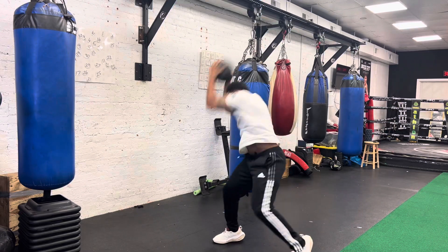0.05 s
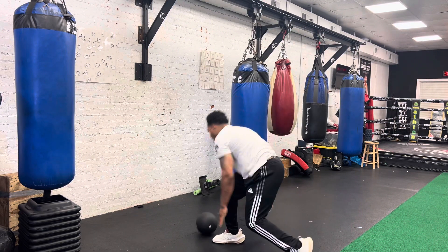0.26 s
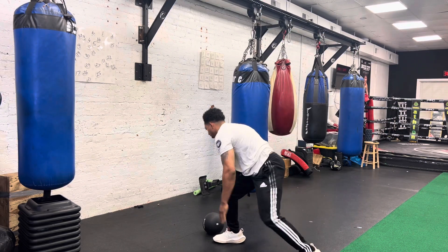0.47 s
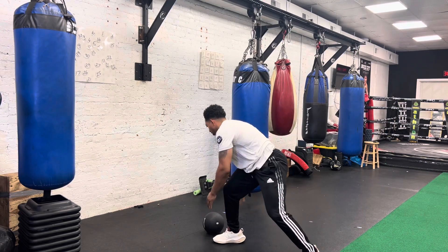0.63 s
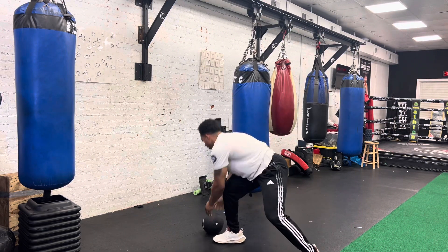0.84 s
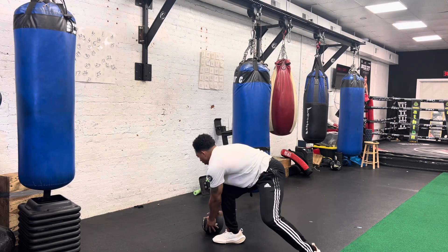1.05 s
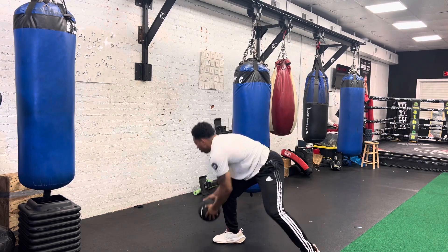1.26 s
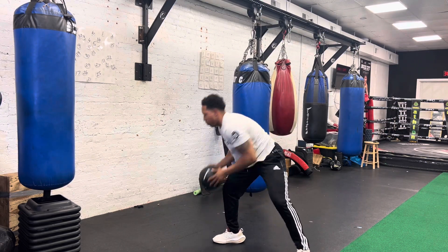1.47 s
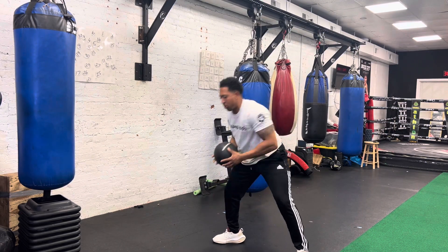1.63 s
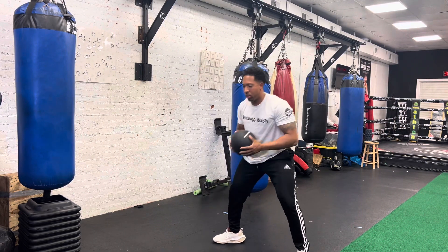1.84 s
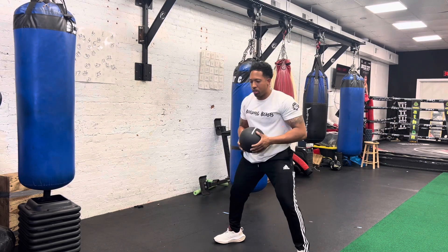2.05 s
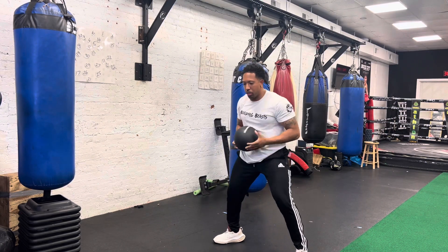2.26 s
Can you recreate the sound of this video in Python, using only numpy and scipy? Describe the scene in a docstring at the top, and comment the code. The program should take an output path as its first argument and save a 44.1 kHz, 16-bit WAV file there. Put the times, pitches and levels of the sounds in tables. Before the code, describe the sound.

A heavy rubber medicine ball slams onto a gym floor at about 0.2 seconds, right after a quick swish of clothes and air and a foot stamp. The loud slap and ringing thud echo through the large room, with a low boom fading over about a second. Hands faintly touch the ball at 1 second and catch it with a soft pat near 1.65. Ventilation hums faintly throughout.

```python
"""A swish of clothes and air and a foot stamp, then a heavy rubber medicine ball slams on a gym floor.
Its skin slaps, and the impact excites the ball's damped modes: a ringing thud. Slap and thud reflect
from the walls, low modes of floor and hall boom, and reverberation rolls around the large room.
The ball is picked up and caught in the hands, while the ventilation hums and hisses throughout."""
import sys
import numpy as np
from scipy import signal
from scipy.fft import rfft, irfft, next_fast_len
from scipy.io import wavfile
from scipy.ndimage import map_coordinates

SR = 44100
rng = np.random.default_rng(int(sys.argv[2]) if len(sys.argv) > 2 else 0)


def put_to_file(sound):
    """Save the sound as 16-bit audio at rate SR, in the file named by the first command-line argument."""
    columns = np.atleast_2d(sound).T  # one column per channel
    safe = np.clip(columns, -1, 1)
    whole_steps = np.round(safe * 32767)
    wavfile.write(sys.argv[1], SR, whole_steps.astype(np.int16))


N = 101429
SLAM_S = .2115

# spectrum of the skin's slap on the floor (frequency [Hz], relative density [dB])
SLAP_SPECTRUM = [(200, -10), (900, 1), (2500, -1), (5000, -9), (8000, -16), (15000, -24.5)]
# spectrum of the hall's long, low afterglow (frequency [Hz], relative density [dB])
AFTERGLOW_SPECTRUM = [(40, -32.5), (90, 7.5), (160, 0), (300, -20), (600, -38.5), (2000, -64.5)]


def amp(db):
    """Decibels to amplitude ratio."""
    return 10 ** (np.asarray(db) / 20)


def unit(x):
    """Normalisation to rms 1."""
    return x / np.sqrt(np.mean(x ** 2) + 1e-20)


def along(points, hz):
    """Interpolation of (frequency, value) points on a logarithmic frequency axis."""
    f, v = np.transpose(points)
    return np.interp(np.log(hz + 1), np.log(f + 1), v)


def since(s):
    """Seconds elapsed since time s, zero before it."""
    return np.maximum(np.arange(N) / SR - s, 0)


def strike(s, rise, t60):
    """Exponential rise and decay from time s; rise and t60 are in seconds."""
    t = since(s)
    return (1 - np.exp(-t / rise)) * amp(-60 * t / t60)


def pan(db):
    """Level difference: two gains, the left db above the right."""
    return amp(np.array([[db], [-db]]) / 2)


def wobble(rate):
    """Random modulation: straight lines through rate Gaussian values a second."""
    return map_coordinates(rng.standard_normal(N // 8), [np.arange(N) * rate / SR], order=1)


def filtered(x, response):
    """Linear filtering: the spectrum of x times a frequency response."""
    size = next_fast_len(N + 8192)
    return irfft(rfft(x, size) * response(np.fft.rfftfreq(size, 1 / SR)), size)[..., :N]


def diffuse(spectrum):
    """Diffuse field: stereo noise of rms 1, alike in both channels at long wavelengths."""
    # likeness of left and right (frequency [Hz], correlation [1])
    correlation = [(60, .995), (130, .95), (290, .85), (640, .35), (1410, 0), (3100, .14), (7000, .1),
                   (15000, .2)]

    def mid_and_side(hz):
        angle = np.arccos(np.clip(along(correlation, hz), -1, 1)) / 2
        return amp(along(spectrum, hz)) * [np.cos(angle), np.sin(angle)]

    mid, side = filtered(rng.standard_normal((2, N)), mid_and_side)
    return unit(np.array([mid + side, mid - side]))


def reverberation(s, spectrum, held):
    """Reverberant decay, each frequency at its own rate; if held, it waits while the hall fills."""
    # reverberation time (frequency [Hz], t60 [s])
    decay_times = [(60, 1), (160, 0.53), (320, 0.67), (600, 0.46), (1200, .47), (2000, 0.66), (2800, .72),
                   (4200, 0.56), (7000, 0.53), (13000, .52)]
    # plateau before the decay (frequency [Hz], duration [s])
    hold_times = [(80, .085), (300, .07), (1000, .045), (3000, 0.016), (12000, 0.025)]
    hz, t, bins = signal.stft(diffuse(spectrum), SR, nperseg=512)
    age = np.maximum(t - s - held * along(hold_times, hz)[:, None], 0)
    decay = amp(-60 * age / along(decay_times, hz)[:, None])
    tail = signal.istft(bins * decay, SR, nperseg=512)[1][:, :N]
    return tail * (1 - np.exp(-since(s) / .007))


def ventilation():
    """Stationary noise, a rumble and a duct's hiss on the left; a wavering low drone joins later."""
    # broadband rumble (frequency [Hz], relative density [dB])
    rumble = [(20, -16), (35, -11.5), (55, 4.5), (90, 0), (140, -10.5), (260, -19.5), (500, -29),
              (900, -33), (2600, -45), (4000, -48.5), (7500, -54), (13000, -50.5), (16000, -57)]
    # narrow duct hiss (frequency [Hz], relative density [dB])
    duct = [(800, -41), (1150, -15.5), (1400, -5.5), (1560, 2.5), (1750, -7), (2050, -11.5), (2500, -27),
            (3500, -29), (5000, -36), (8000, -45.5)]
    drone_hz, t = 76, since(1.3)
    phase = 2 * np.pi * drone_hz * t + .33 * wobble(9.5)
    drone = amp(-49.5 + 3.5 * wobble(7)) * (1 - np.exp(-t / .073)) * np.sin(phase)
    return amp(-53) * diffuse(rumble) + amp(-64.5) * pan(db=15.5) * diffuse(duct) + drone


def clothes():
    """Friction noise: fabric rubs in a grainy swell with each move."""
    # Gaussian swells (time [s], half width [s], level [dB])
    rustles = [(0.093, 0.029, -58.5), (0.181, 0.026, -45), (1.035, .025, -68.5), (1.22, .04, -86),
               (1.331, 0.045, -91), (1.518, 0.15, -65)]
    # rubbing fabric (frequency [Hz], relative density [dB])
    cloth = [(300, -1.5), (1500, 1), (3000, -0.5), (5000, -5), (8000, -9.5), (13000, -6), (16000, -21)]
    t = np.arange(N) / SR
    swell = sum(amp(db) * np.exp(-((t - s) / width) ** 2 / 2) for s, width, db in rustles)
    return swell * amp(.86 * wobble(290)) * diffuse(cloth)


def catches():
    """Soft impacts: palms pat the ball, weakly exciting its modes, and the hall answers."""
    # hands meet the ball (time [s], level [dB])
    contacts = [(1.006, -64.5), (1.64, -60), (1.6499, -44.5)]
    # direct pat (frequency [Hz], relative density [dB])
    palm = [(60, -24), (150, -26), (320, 11.5), (550, -5.5), (900, -5), (1500, -6.5), (2200, 4),
            (3200, -13.5), (5000, -14), (8000, -16.5), (13000, -22), (16000, -26)]
    # its reverberation (frequency [Hz], relative density [dB])
    palm_echo = [(60, -6), (150, 8.5), (250, 1.5), (390, 1.5), (520, -12.5), (950, -12), (1500, -16),
                 (2150, -6.5), (3000, -23), (3600, -16.5), (6000, -22.5), (13000, -28.5), (16000, -31)]
    out = 0
    for s, db in contacts:
        pat = 2 * strike(s, rise=.0006, t60=.091) * diffuse(palm) + amp(-16) * ball_ring(s)
        echo = amp(-1) * reverberation(s, palm_echo, held=False)
        afterglow = amp(-3) * strike(s, rise=.026, t60=.77) * diffuse(AFTERGLOW_SPECTRUM)
        out = out + amp(db) * (pat + echo + afterglow)
    return out


def whistle():
    """Flow noise in a narrow band, which glides up as the falling ball gains speed."""
    centre_hz, glide_hz_per_s, half_width_s = 918, 6600, .029
    t = np.arange(N) / SR - .2
    phase = 2 * np.pi * (centre_hz * t + glide_hz_per_s * t ** 2 / 2)
    bands = [unit(wobble(1100) * np.sin(phase) + wobble(1100) * np.cos(phase)) for _ in range(2)]
    return amp(-38.5) * np.exp(-(t / half_width_s) ** 2 / 2) * np.array(bands)


def swish():
    """Broadband flow noise: air rushing past the ball swells to a peak around the impact."""
    # rushing air (frequency [Hz], relative density [dB])
    air = [(30, 2.5), (110, 7.5), (300, -13.5), (500, -15.5), (800, -13), (1400, -15.5), (3000, -84.5),
           (8000, -20)]
    peak_s, slope_db_per_s = .23, 339
    return amp(-27.5 - slope_db_per_s * abs(np.arange(N) / SR - peak_s)) * diffuse(air)


def stamp():
    """Impact noise: a foot stamps just before the ball lands."""
    # foot on the floor (frequency [Hz], relative density [dB])
    footfall = [(30, -24.5), (80, -14), (170, 3.5), (300, -9), (550, -22), (1200, -37), (3000, -38),
                (8000, -52)]
    return amp(-13.5) * strike(.185, rise=.022, t60=.25) * diffuse(footfall)


def hall_response():
    """Room modes and reverberation: the slam leaves a boom, a roar and a long, low afterglow."""
    # modes of floor and hall (frequency [Hz], level [dB], rise [s], t60 [s])
    room_modes = [(52.77, -12, 0.036, 0.93), (100.4, -29, 0.12, 1.3), (145.7, -32.5, .05, 2.12)]
    # reverberant roar (frequency [Hz], relative density [dB])
    roar_spectrum = [(25, -27.5), (52, -2), (110, -1.5), (170, -1.5), (320, -3.5), (440, -15), (620, -8.5),
                     (900, -17.5), (1300, -14.5), (2000, -23), (3200, -19.5), (4200, -25), (5500, -21.5),
                     (8000, -30), (13500, -38), (16000, -49.5)]
    # the roar's balance (frequency [Hz], left minus right [dB])
    balance = [(60, -1), (200, -.5), (420, -3), (700, -5), (1300, 1.5), (1950, -3), (2800, 1), (4000, 2),
               (5000, 6), (6500, 1), (8000, 0)]
    boom = sum(amp(db) * strike(SLAM_S, rise, t60) * np.sin(2 * np.pi * hz * since(SLAM_S))
               for hz, db, rise, t60 in room_modes)
    roar = reverberation(SLAM_S, roar_spectrum, held=True) * amp(.8 * wobble(400))
    roar = filtered(roar, lambda hz: amp(np.outer([.5, -.5], along(balance, hz))))
    afterglow = strike(SLAM_S, rise=.05, t60=2.1) * diffuse(AFTERGLOW_SPECTRUM)
    return boom + amp(-13.5) * roar + amp(-32) * afterglow


def wall_echoes():
    """Early reflections: slap and thud return, the slap weaker the longer its path."""
    # returns from walls and ceiling (delay [s], relative thud level [dB], slap left minus right [dB])
    reflections = [(.0058, -10, -10.5), (.0112, -12, 1), (0.027, -2, 1.5), (0.033, -12.5, -33),
                   (0.057, -12.5, 1.5), (0.074, -1.5, -4)]
    loss_db_per_s = 320.5
    out = 0
    for delay, thud_db, side_db in reflections:
        s = SLAM_S + delay
        slap = amp(-15 - loss_db_per_s * delay) * strike(s, rise=.0005, t60=.026) * diffuse(SLAP_SPECTRUM)
        thud = amp(-14.5 + thud_db) * ball_ring(s, longest_t60=.053)
        out = out + pan(side_db) * slap + thud
    return out


def ball_ring(s, longest_t60=1):
    """Free vibration: the struck ball's damped modes, wavering differently in each channel."""
    # modes of the ball (frequency [Hz], level [dB], t60 [s], left minus right [dB])
    modes = [(158, -2.5, .09, 0.5), (276, -3, 0.13, 0), (299.2, -1.5, 0.35, 0), (438, -19, .25, -3),
             (558, -10.5, 0.6, 1.5), (580, -23.5, .42, -6), (804, -22, 0.19, -5.5),
             (1053, -18.5, 0.23, -1.5), (1139.3, -11.5, 0.42, 0.5), (1382, -19, .32, 1.5)]
    t = since(s)
    drift_rad_per_khz = (1 - np.exp(-t / .0078)) * np.array([wobble(20), wobble(20)])
    out = 0
    for hz, db, t60, side_db in modes:
        envelope = amp(db) * strike(s, rise=.0008, t60=min(t60, longest_t60))
        phase = 2 * np.pi * hz * t + drift_rad_per_khz * hz / 1000
        out = out - pan(side_db) * envelope * np.sin(phase)
    return out


def slam():
    """Impulsive excitation: the skin slaps the floor and sets the ball ringing."""
    slap = strike(SLAM_S, rise=.0001, t60=.004) * diffuse(SLAP_SPECTRUM)
    return amp(-3.5) * pan(db=-8) * slap + amp(-11.5) * ball_ring(SLAM_S)


def scene():
    """Superposition of all the sources in the gym."""
    throw = swish() + stamp() + whistle()
    impact = slam() + wall_echoes() + hall_response()
    return throw + impact + clothes() + catches() + ventilation()


def record(dry):
    """Tone shaping thins the deep bass; soft clipping rounds off peaks; a low-pass limits the band."""
    # the centre, hollowed near 10 kHz (frequency [Hz], gain [dB])
    mid_response = [(20, -14), (42, -2.5), (8400, -1.5), (9000, -7), (9400, -23.5), (10000, -34),
                    (10700, -19), (11300, -1)]
    # the sides, their top treble softened (frequency [Hz], gain [dB])
    side_response = [(20, -19.5), (150, 1), (8400, -3), (10000, -2.5), (11300, -0.5), (13000, -7.5)]
    ceiling, cutoff_hz = .95, 15700
    mid = filtered((dry[0] + dry[1]) / 2, lambda hz: amp(along(mid_response, hz)))
    side = filtered((dry[0] - dry[1]) / 2, lambda hz: amp(along(side_response, hz)))
    stereo = np.array([mid + side, mid - side])
    rounded = stereo / (1 + np.abs(stereo / ceiling) ** 14) ** (1 / 14)
    return filtered(rounded, lambda hz: 1 / np.sqrt(1 + (hz / cutoff_hz) ** 120))


dry = scene()
out = record(dry)
put_to_file(out)
```